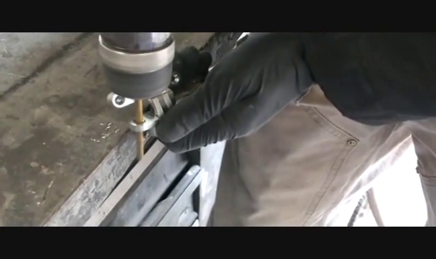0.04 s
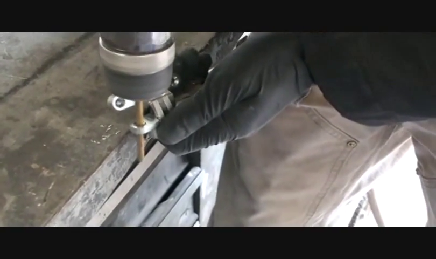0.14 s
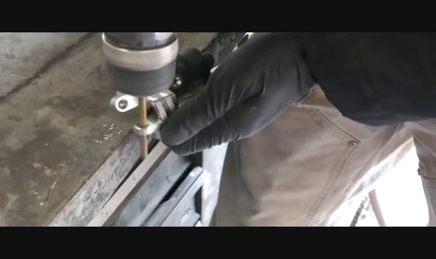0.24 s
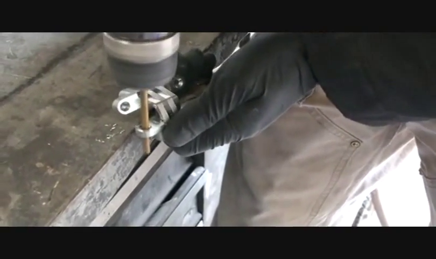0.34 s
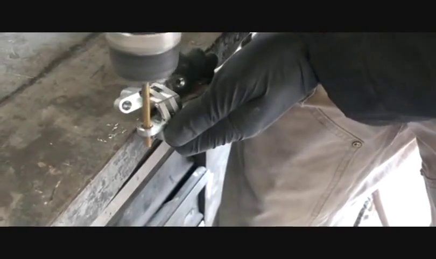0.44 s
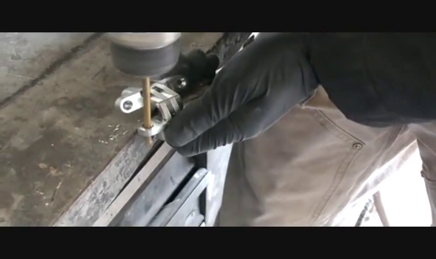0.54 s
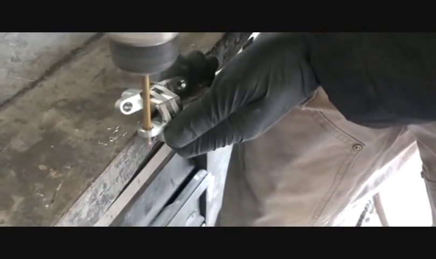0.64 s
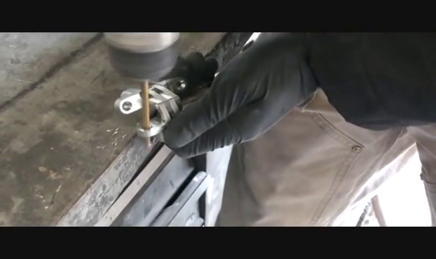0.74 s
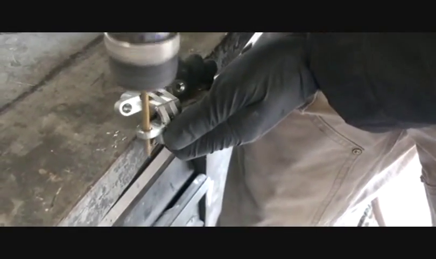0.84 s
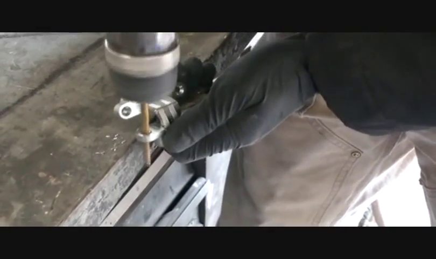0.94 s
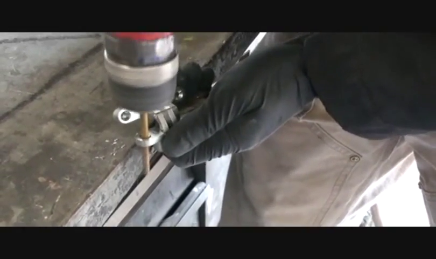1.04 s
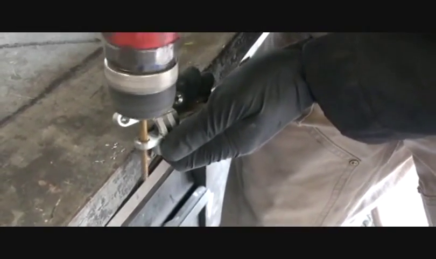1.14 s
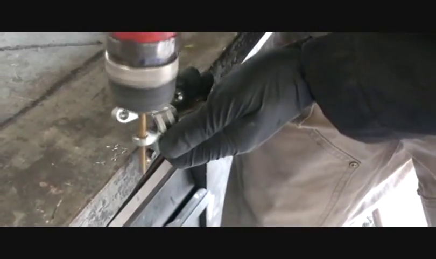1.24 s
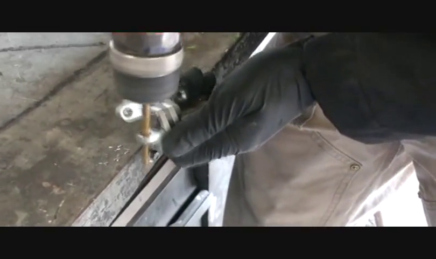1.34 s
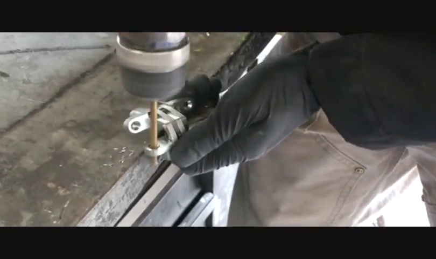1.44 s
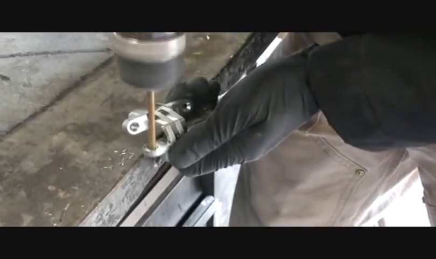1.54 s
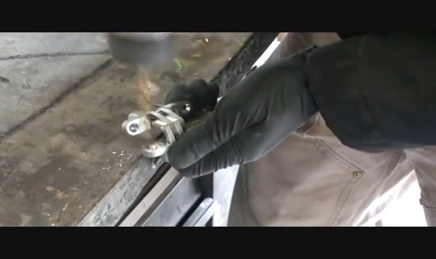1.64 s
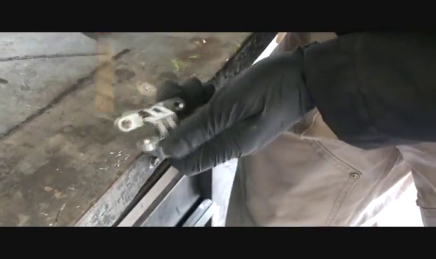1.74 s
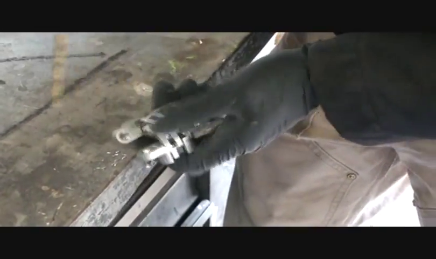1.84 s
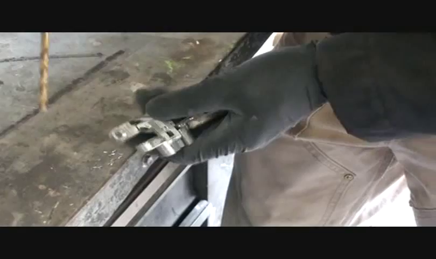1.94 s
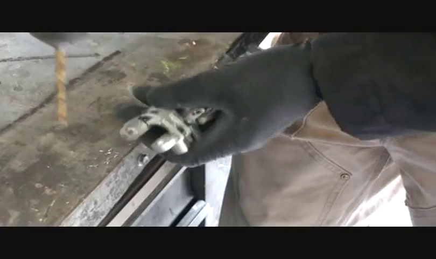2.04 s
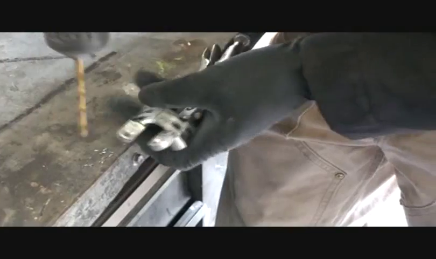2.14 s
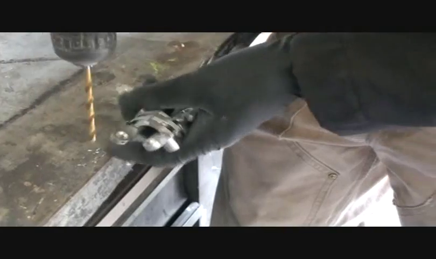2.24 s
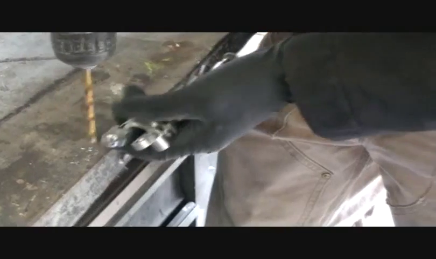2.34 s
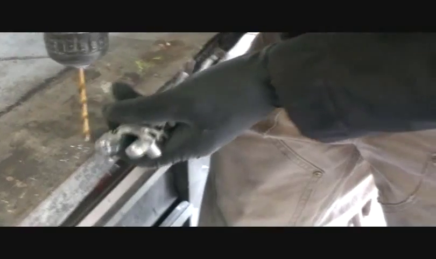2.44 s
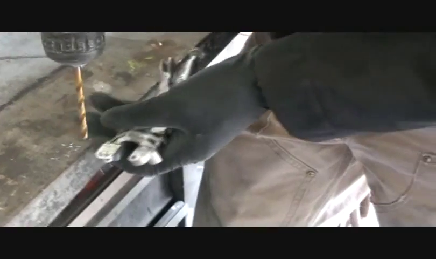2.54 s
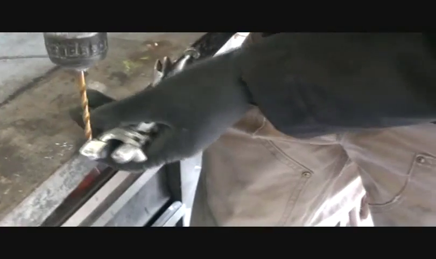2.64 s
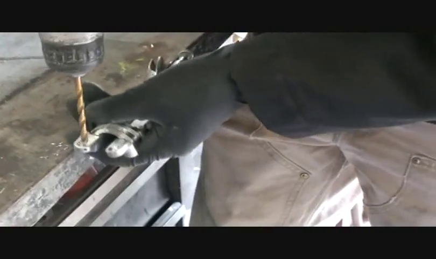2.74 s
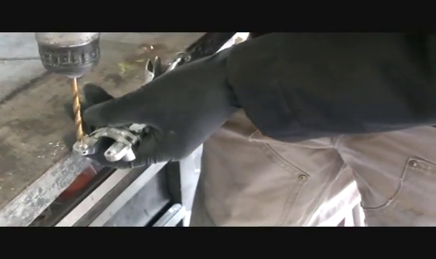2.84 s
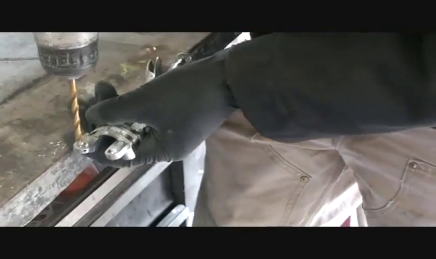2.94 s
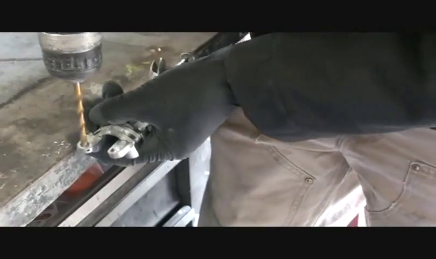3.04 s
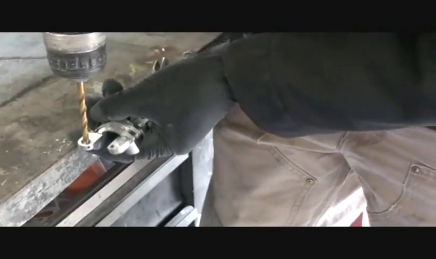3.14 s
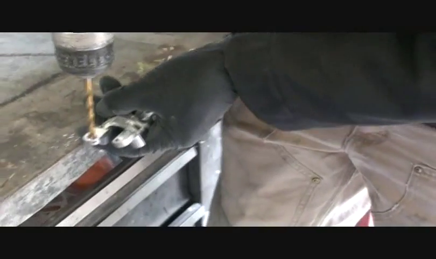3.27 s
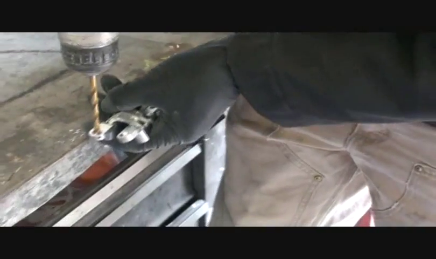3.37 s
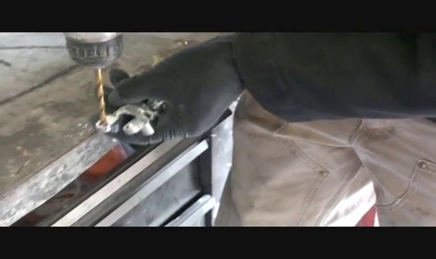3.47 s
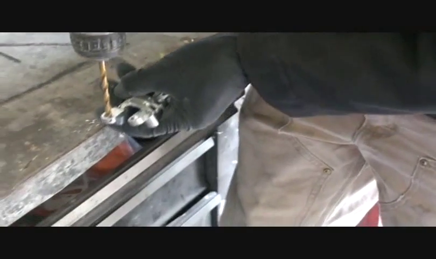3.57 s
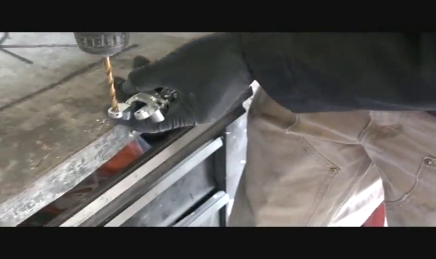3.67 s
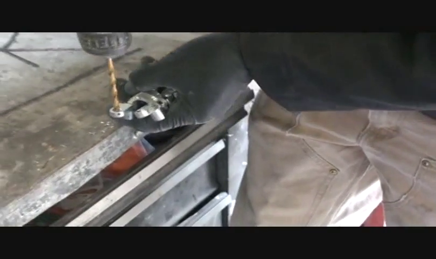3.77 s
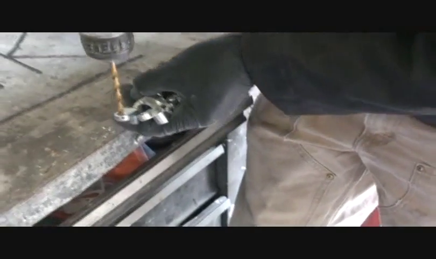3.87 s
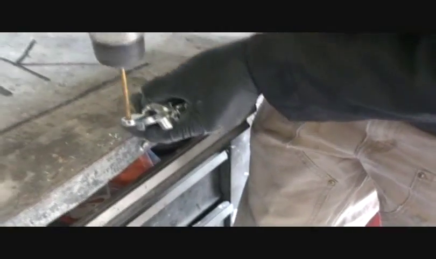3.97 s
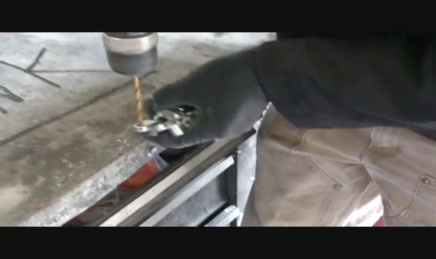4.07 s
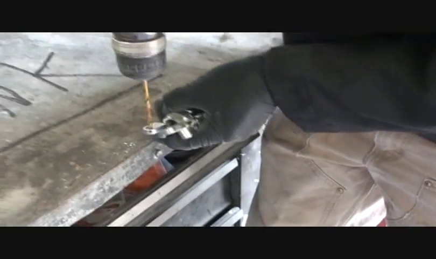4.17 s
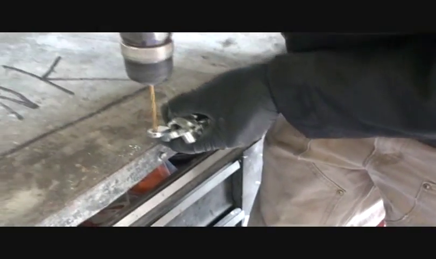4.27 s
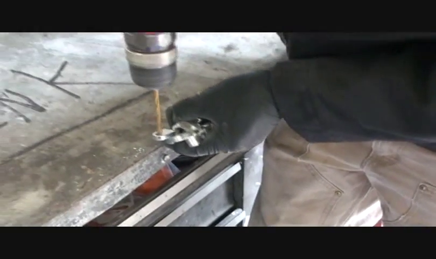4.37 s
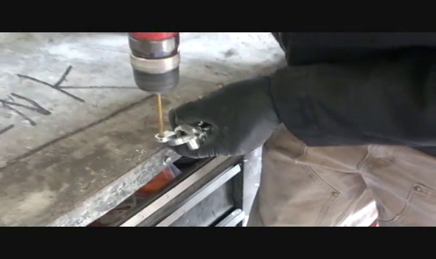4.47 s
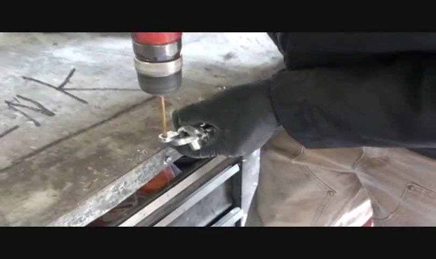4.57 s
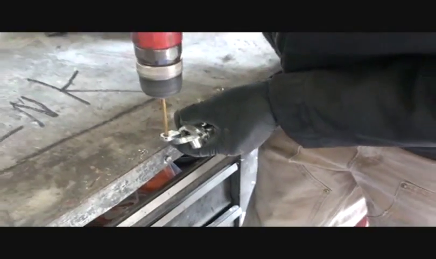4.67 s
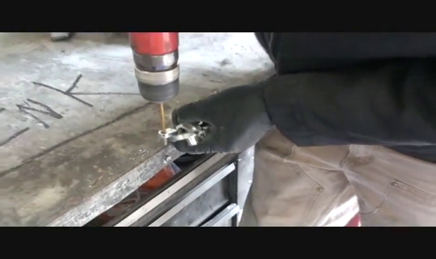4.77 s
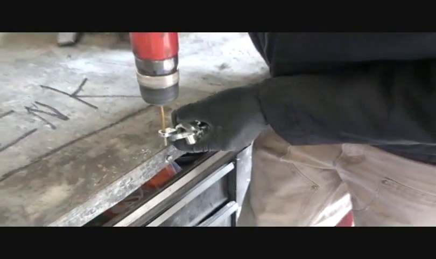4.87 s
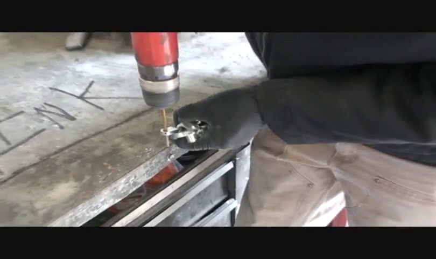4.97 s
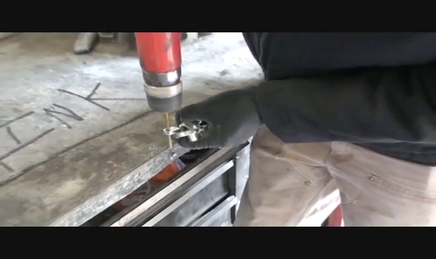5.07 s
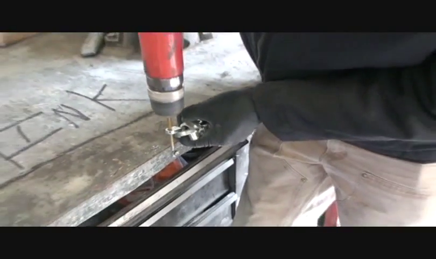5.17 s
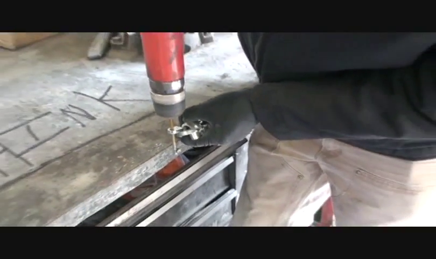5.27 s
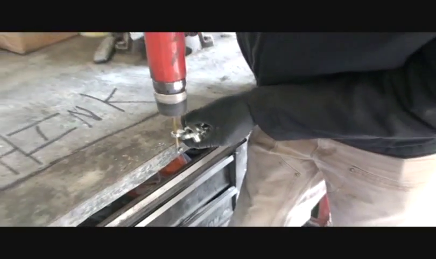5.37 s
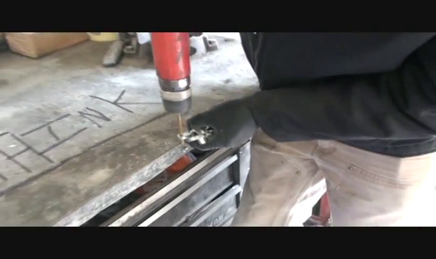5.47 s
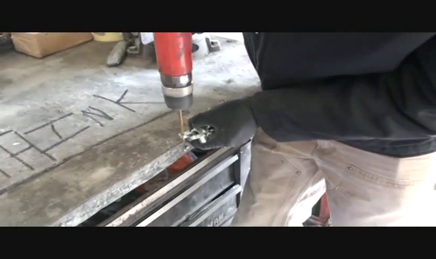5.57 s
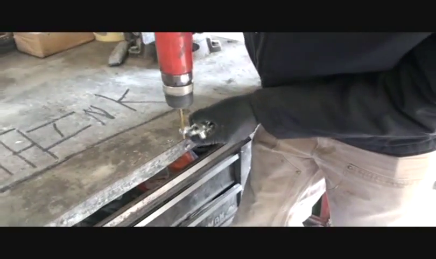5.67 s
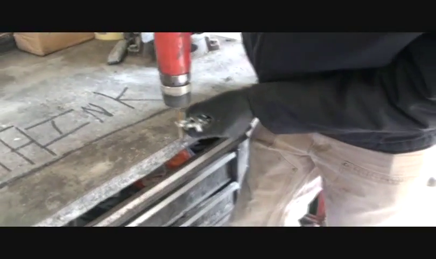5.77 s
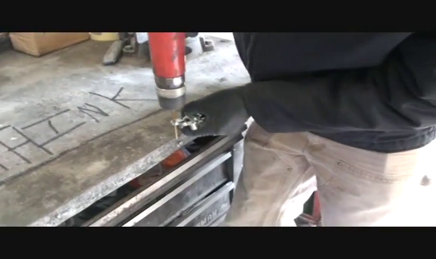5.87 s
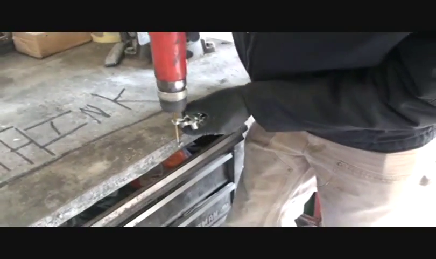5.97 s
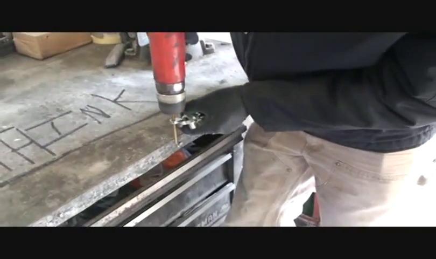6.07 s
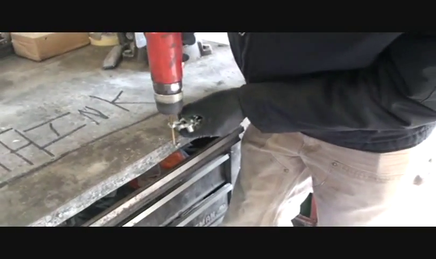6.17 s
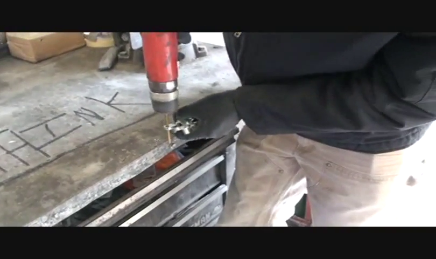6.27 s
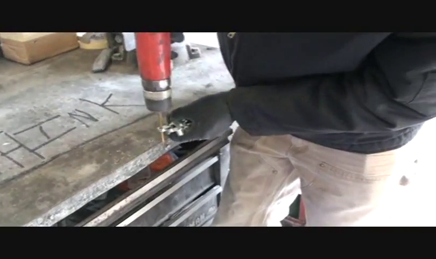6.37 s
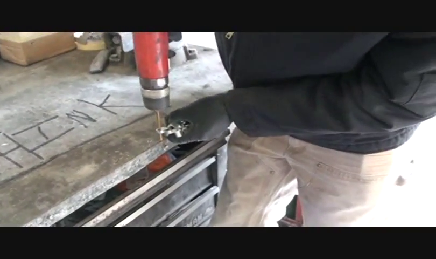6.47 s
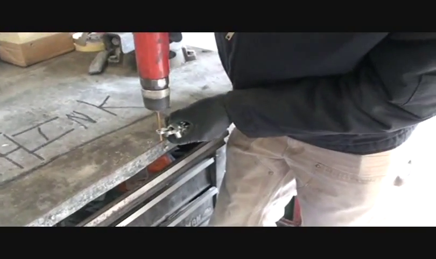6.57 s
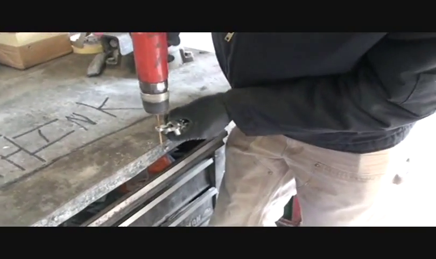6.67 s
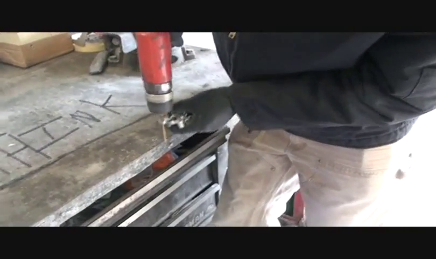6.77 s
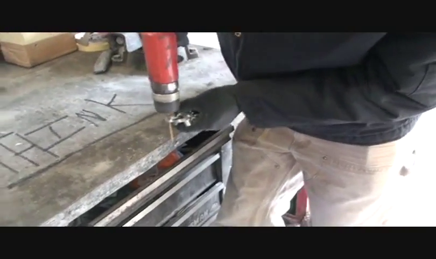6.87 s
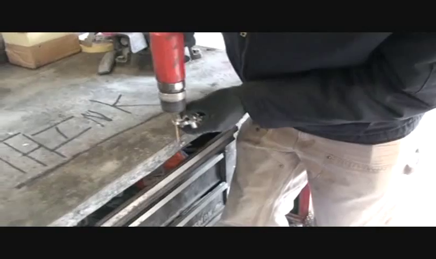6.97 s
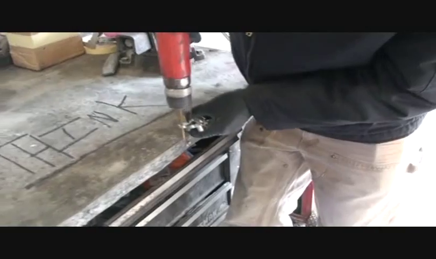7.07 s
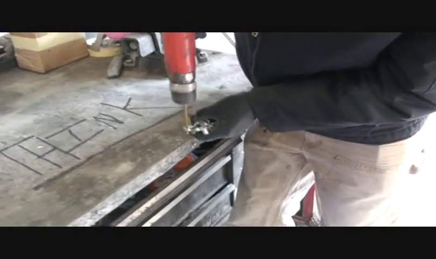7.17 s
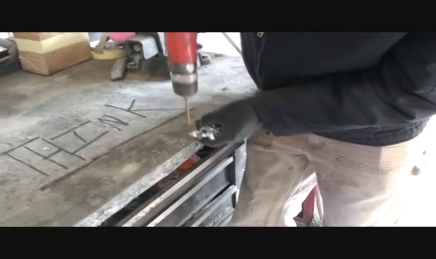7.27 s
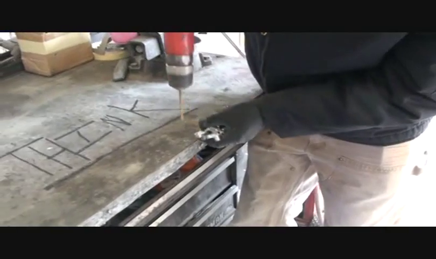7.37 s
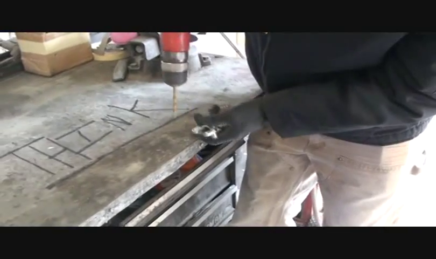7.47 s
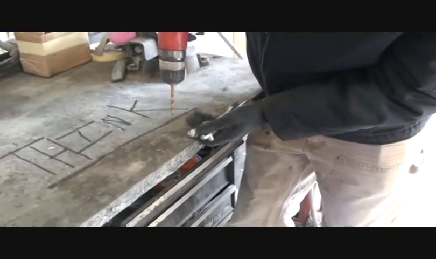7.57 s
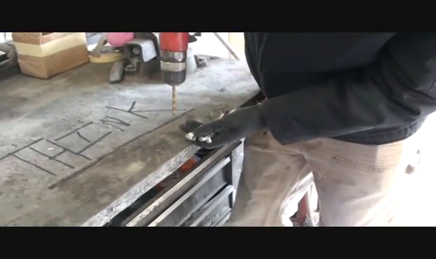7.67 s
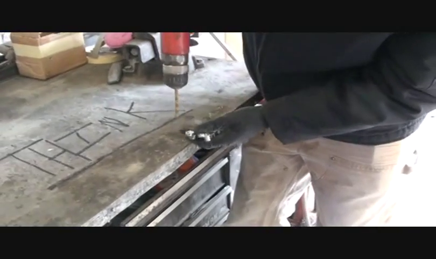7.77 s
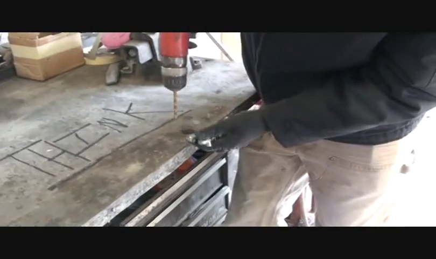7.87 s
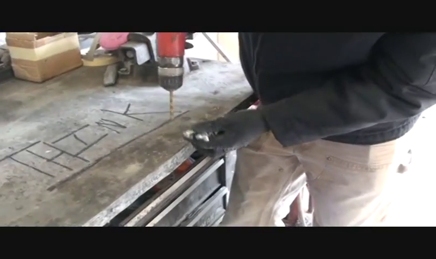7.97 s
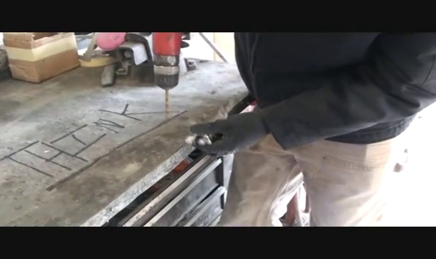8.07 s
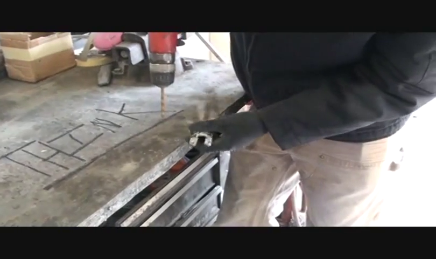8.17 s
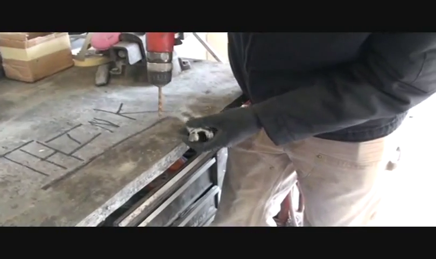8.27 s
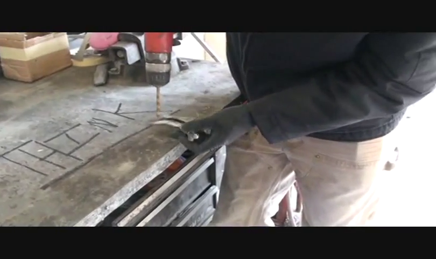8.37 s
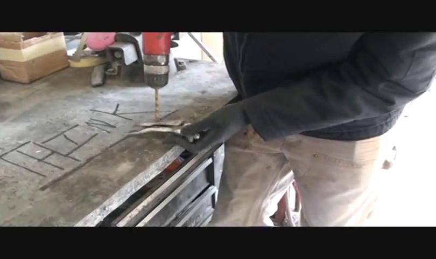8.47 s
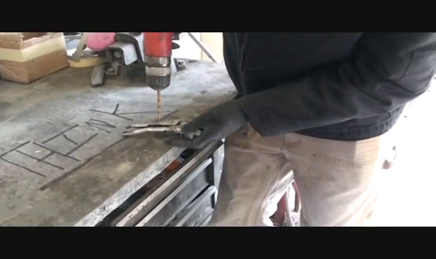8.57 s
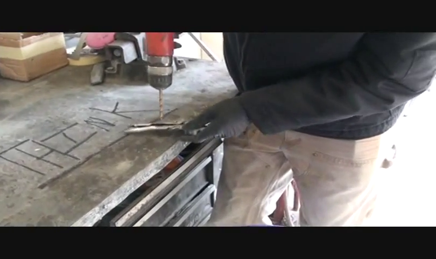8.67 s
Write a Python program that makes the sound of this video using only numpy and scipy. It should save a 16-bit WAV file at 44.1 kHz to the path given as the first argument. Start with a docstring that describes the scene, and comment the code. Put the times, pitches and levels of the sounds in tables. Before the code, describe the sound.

A handheld air drill whines shrilly in a workshop, stops, gives two short bursts, runs long, then coasts down before a loud steel clack.

```python
"""A workshop, mono, one microphone: a handheld air drill bores a metal hinge.
It is already running; a pause, two blips and a long run follow, over shop hiss and a faint air leak.
Vane pulses give a whine that rings in the exhaust and sags when the bit bites; they also chop the hiss.
In the pauses a gloved hand shifts the hinge (soft swells of low noise) amid light knocks; at the end
a steel tool clacks down (noise cracks with damped ringing). The room adds reflections and a tail."""
import sys
import numpy as np
from scipy import signal
from scipy.fft import rfft, irfft, next_fast_len
from scipy.io import wavfile
from scipy.ndimage import uniform_filter1d

SR = 44100
rng = np.random.default_rng(int(sys.argv[2]) if len(sys.argv) > 2 else 0)


def dump(signal):
    """Clip the signal to [-1, 1] and save it as 16-bit WAV at the path in sys.argv[1]."""
    limited = np.clip(np.atleast_2d(signal).T, -1, 1)
    pcm = np.round(limited * 32767).astype(np.int16)
    wavfile.write(sys.argv[1], SR, pcm)


N = 384111
TIME = np.arange(N) / SR
SPIN_UP_S, COAST_S = 0.021, 0.054  # time constants of the rotor with the air on and off


def amp(db):
    """Decibels to gain."""
    return np.exp(np.asarray(db) * np.log(10) / 20)


def unit(x):
    """Scales to rms 1."""
    return x / np.sqrt(np.mean(x ** 2) + 1e-20)


def along(rows):
    """The columns of a curve table, one value per sample."""
    s, *columns = np.transpose(rows)
    return [np.interp(TIME, s, column) for column in columns]


def at_hz(points, hz):
    """Reads a spectrum on a log-frequency axis."""
    f, value = np.transpose(points)
    return np.interp(np.log(hz + 1), np.log(f), value)


def coloured(spectrum, size=N, tilt_db=0):
    """Noise of rms 1 with the given spectrum, tilted per octave."""
    length = next_fast_len(size)
    hz = np.fft.rfftfreq(length, 1 / SR)
    tilt = tilt_db * np.log2((hz + 100) / 2000)
    gain = amp(at_hz(spectrum, hz) + tilt)
    white = rfft(rng.standard_normal(length))
    return unit(irfft(white * gain, length)[:size])


def wander(rate):
    """Random line of rms 1 joining fresh values, rate of them a second."""
    steps = rng.standard_normal(8192)
    return unit(np.interp(TIME * rate, np.arange(len(steps)), steps))


def add(mix, s, sound):
    """Mixes a sound in at time s."""
    part = mix[max(round(s * SR), 0):][:len(sound)]
    part += sound[:len(part)]


def hump(hz, centre_hz, width_hz):
    """Flat-topped, steep-sided gain of a resonance."""
    off = ((hz - centre_hz) / width_hz) ** 2
    return 1 / (1 + off ** 3)


# Vane passes under the steady push of the hand, before any bite, one list a long run: t/s, f/Hz
STEADY_SPEED = [
    [(0.0, 751.8), (0.79, 755.9), (1.062, 751.5), (1.22, 756), (1.328, 735.3), (1.342, 743.3),
     (1.366, 725.6), (1.384, 740.1), (1.58, 759.2), (1.68, 754.7)],
    [(5.03, 744), (5.07, 753), (5.08, 740.5), (5.12, 753.6), (5.13, 742.4), (5.24, 753.3), (5.61, 756.2),
     (6.18, 755), (6.22, 746.1), (6.31, 757.5), (7.31, 756.7)],
]
# Pulls of the trigger: pressed t/s, released t/s, share left open after release,
# hiss level/dB (before a common trim), howl level/dB, whine after release level/dB
TRIGGER_PULLS = [(-0.5, 1.695, 0, -23, -22, 0.5), (4.024, 4.156, 0.0017, -22, -9.5, -2),
                 (4.295, 4.877, .22, -23, -7.5, -9), (4.936, 7.329, 0.0053, -21.5, -9.5, 1)]
VALVE_OPEN_S, VALVE_SHUT_S = 0.02, 0.009
ROTOR_LAG_S = 0.007  # the air comes before the rotor moves


def rotor(sag_hz):
    """Each pull opens the valve and spins the rotor up; let go, it coasts towards the share left open."""
    driven_hz = along(np.vstack(STEADY_SPEED))[0] - sag_hz
    hz, valve, hiss_db, howl_db, vane_db = np.zeros((5, N))
    for press, release, left, hiss, howl, after_db in TRIGGER_PULLS:
        on = TIME >= press
        held = np.minimum(TIME[on], release) - press
        since = np.maximum(TIME[on] - release, 0)
        shut = 1 - np.exp(-since / VALVE_SHUT_S)
        # speed starts from whatever the pull before has left
        catching_up = np.exp(-np.maximum(held - ROTOR_LAG_S, 0) / SPIN_UP_S)
        rising = driven_hz[on] + (hz[on][0] - driven_hz[on]) * catching_up
        hz[on] = rising * (left + (1 - left) * np.exp(-since / COAST_S))
        opening = np.minimum(valve[on][0] + held / VALVE_OPEN_S, 1)
        valve[on] = opening * (1 - (1 - left) * shut)
        fading = np.maximum(1 - held / VALVE_OPEN_S, 0)
        vane_db[on] = vane_db[on][0] * fading + after_db * shut
        hiss_db[on], howl_db[on] = hiss, howl
    return hz, valve, hiss_db, howl_db, vane_db


# Broad exhaust resonances: running free f/Hz, under load f/Hz, half width/Hz
EXHAUST_RESONANCES = [(2410, 2420, 495), (2937, 2570, 325)]
# Their levels running free, before the trim, one list a long run: t/s, lower level/dB, upper level/dB
EXHAUST_LEVELS = [
    [(0.0, -12, -14.5), (0.276, -13, -12.5), (0.346, -16, -11), (0.574, -12.5, -14.5),
     (0.714, -12.5, -22.5), (0.874, -12, -20), (0.94, -12.5, -15.5), (1.178, -13.5, -11.5),
     (1.352, -12, -20.5), (1.468, -8.5, -15), (1.516, -12, -18.5), (1.572, -13, -15.5),
     (1.68, -12.5, -27.5)],
    [(4.99, -19.5, -16.5), (5.34, -18, -17), (5.39, -29, -13), (5.48, -16.5, -15.5), (5.63, -17, -20.5),
     (5.9, -16.5, -10), (6.27, -30, -8.5), (6.29, -20, -9.5), (6.47, -16.5, -12), (6.56, -20, -13.5),
     (7.0, -16.5, -11), (7.27, -32, -11.5), (7.32, -31, -15)],
]
# Trim running free: lower level/dB, upper level/dB
FREE_TRIM = [1.0, 1.48]
# Levels in place of those above once the motor labours: lower level/dB, upper level/dB
LOADED_LEVELS = [-14.5, -21]
# Narrow peaks of the outlet: f/Hz, half width/Hz
OUTLET_PEAKS = [(5270, 130), (6800, 220)]
# Their levels before the shrill trims, one list a long run: t/s, first level/dB, second level/dB
SHRILL_LEVELS = [
    [(0.0, -26.5, -35), (0.088, -23.5, -38.5), (0.626, -25, -31.5), (1.24, -24, -37), (1.328, -25, -32),
     (1.478, -25.5, -39.5), (1.506, -23, -35), (1.68, -31, -33.5)],
    [(5.03, -35, -27), (5.24, -31.5, -33), (6.19, -33, -25.5), (6.22, -29.5, -38.5), (6.26, -36, -28.5),
     (6.72, -25, -27), (6.89, -37.5, -38), (7.31, -30, -31)],
]
# Sharp peaks of the exhaust that gliding harmonics cross: f/Hz, half width/Hz
HOWL_PEAKS = [(2490, 60), (2920, 48)]
LABOUR_LOAD = 0.25  # load at which the labouring levels are reached
FULL_RING_HZ, RING_LAW = 560, 1.7  # below this speed the ringing weakens by this power of it


def exhaust_peaks(hz, load, valve, throb_db, howl_db, shut_db=-3, shrill_db=2.5, shrill_load_db=-10):
    """The exhaust's resonances as they move with load and speed: (f/Hz, half width/Hz, gain)."""
    labour = np.minimum(load / LABOUR_LOAD, 1)
    ring = np.minimum(hz / FULL_RING_HZ, 1) ** RING_LAW * amp(throb_db)
    peaks = []
    free_levels = along(np.vstack(EXHAUST_LEVELS))
    broad = zip(EXHAUST_RESONANCES, free_levels, FREE_TRIM, LOADED_LEVELS)
    for (free_hz, loaded_hz, width), free_db, trim, loaded_db in broad:
        db = (free_db + trim) * (1 - labour) + loaded_db * labour
        centre = free_hz + (loaded_hz - free_hz) * load
        peaks.append((centre, width, ring * amp(db + shut_db * (1 - valve))))
    for (f, width), db in zip(OUTLET_PEAKS, along(np.vstack(SHRILL_LEVELS))):
        peaks.append((f, width, amp(db + shrill_db + shrill_load_db * labour)))
    for f, width in HOWL_PEAKS:
        peaks.append((f, width, ring * amp(howl_db)))
    return peaks


# Relative level of a partial outside the resonances: f/Hz, level/dB
WHINE_BODY = [(150, -47), (330, -31.5), (430, -33), (520, -27), (755, -24.5), (1080, -25), (1380, -32.5),
              (1505, -26.5), (1570, -36.5), (3200, -23), (3780, -27.5), (4400, -33.5), (6200, -35),
              (7500, -43.5), (10000, -49), (12000, -44.5), (15000, -54)]


def whine(turns, hz, load, coast, peaks, flutter_db=0.86, bite_flutter_db=3.0, treble_flutter_db=2.0,
          coast_db=4.5, load_dull_db=-6):
    """Harmonics of the vane pulses swell as they glide through the exhaust's resonances."""
    slow = slice(None, None, 16)  # levels are worked out at every 16th sample
    hz, load, coast = hz[slow], load[slow], coast[slow]
    peaks = [(np.broadcast_to(f, N)[slow], width, gain[slow]) for f, width, gain in peaks]
    out = np.zeros(N)
    for k in range(1, 17):
        # a coasting rotor gives a deeper note, a loaded one loses its middle partials
        deepening = coast_db * coast * (1 if k < 5 else -1)
        dulling = load_dull_db * load * hump(k * hz, 3900, 1400)
        body = amp(at_hz(WHINE_BODY, k * hz) + deepening + dulling)
        power = body ** 2 + sum((gain * hump(k * hz, f, width)) ** 2 for f, width, gain in peaks)
        # turbulence shakes the partials; up to the fourth it grows with number and with the bite
        shake_db = treble_flutter_db
        if k < 5:
            shake_db = (flutter_db + bite_flutter_db * np.sqrt(load)) * k / 4
        level = np.sqrt(2 * power) * amp(shake_db * wander(110)[slow])
        tone = np.cos(2 * np.pi * (k * turns + rng.random()))
        out += np.interp(TIME, TIME[slow], level) * tone
    return out


# Dips where sound off the bench cancels the direct hiss: from t/s, to t/s, f/Hz, half width/Hz
BENCH_DIPS = [(0, 1.42, 925, 85), (0, 1.4, 2057, 60)]


def dipped(x):
    """Takes narrow bands out of the hiss while the drill is held low over the bench."""
    hz, spectrum = np.fft.rfftfreq(N, 1 / SR), rfft(x)
    for start, end, f, width in BENCH_DIPS:
        held = np.interp(TIME, [start - 0.1, start, end, end + 0.32], [0, 1, 1, 0])
        x = x - held * irfft(spectrum * hump(hz, f, width), N)
    return x


# Colour of the rushing air: f/Hz, relative level/dB per Hz
HISS_COLOUR = [(25, -52.5), (80, -29), (300, -52.5), (480, -25), (700, -9.5), (1100, -3), (1700, -3.5),
               (2500, 8), (3400, 3.5), (4200, 6.5), (5400, 2.5), (7000, 0), (9000, -4), (11000, -12.5),
               (15500, -18)]
HISS_TRIM_DB = 2.5  # whole hiss above its treble part


def exhaust_hiss(air, hiss_db):
    """Air rushing out of the exhaust is broad noise, as strong as the flow."""
    return air * amp(hiss_db + HISS_TRIM_DB) * dipped(coloured(HISS_COLOUR))


def sideways_beam(turns, valve, load, beam_db=-12.5):
    """The fourth harmonic leaves the exhaust sideways and comes back off the walls only."""
    return amp(beam_db) * valve * (1 - load) * np.cos(2 * np.pi * 4 * turns)


# Colour of the rattling vanes and gears: f/Hz, relative level/dB per Hz
RATTLE_COLOUR = [(150, -41.5), (400, -18.5), (800, -17.5), (1100, 5.5), (1600, 1.5), (2000, 7), (2550, -1),
                 (3300, 0.5), (6000, -15), (15000, -41.5)]


def gear_rattle(hz, pulses):
    """Vanes and gears rattle as the rotor speeds up or brakes, more the faster its speed changes."""
    change = uniform_filter1d(np.abs(np.gradient(hz)) * SR, size=600)  # Hz per second
    lurch = np.clip(change / 9000, 0, 1)
    return amp(-18.5 + 2.1 * wander(250)) * lurch * pulses * coloured(RATTLE_COLOUR)


# Decay of the shop: f/Hz, t60/s
ROOM_DECAY = [(150, 0.95), (1000, 0.31), (3000, 0.59), (7000, 0.58), (15000, 0.42)]
# Bench, floor and walls, heard after the direct sound: delay t/s, level/dB
ROOM_REFLECTIONS = [(.0047, -22.5), (.0145, -17.5), (.023, -18), (0.139, -33), (.25, -39.5), (0.401, -49)]


def room(x, tail_db=-16, build_s=0.019):
    """A few distinct reflections and a diffuse tail that dies band by band."""
    hz, t, bands = signal.stft(rng.standard_normal(SR), SR, nperseg=256)
    decay = amp(-60 * t / at_hz(ROOM_DECAY, hz)[:, None])
    bands = bands * decay * (1 - np.exp(-t / build_s))
    tail = signal.istft(bands, SR, nperseg=256)[1]
    response = amp(tail_db) * tail / np.linalg.norm(tail)
    for delay, db in ROOM_REFLECTIONS:
        add(response, delay, amp([db]))
    return signal.fftconvolve(x, response)[:N]


# Colour of the shop's background: f/Hz, relative level/dB per Hz
SHOP_COLOUR = [(18, -54.5), (30, -25.5), (137, -9.5), (420, -17), (479, -9), (851, -5), (2480, -11.5),
               (2690, -11), (3680, -15.5), (4420, -9.5), (6040, -14), (7070, -8.5), (10500, -16),
               (12200, -7.5), (15500, -38)]
SHOP_DB = -49


def shop_background():
    """Steady noise of the shop, its level drifting slightly."""
    return amp(SHOP_DB + 0.46 * wander(2.7)) * coloured(SHOP_COLOUR)


# Colour of the air seeping from the idle tool: f/Hz, relative level/dB per Hz
LEAK_COLOUR = [(300, -40), (900, -11.5), (1300, 9.5), (1700, -7), (3000, -22), (4600, -17), (6000, -29),
               (15000, -48.5)]
# Course of the leak: t/s, level/dB
LEAK_LEVEL = [(2.1, -73), (2.45, -57.5), (3.1, -59), (3.6, -60), (4.0, -54.5), (4.3, -70)]


def air_leak():
    """Air seeping through a small gap is faint flickering noise, strongest in the pause."""
    return amp(along(LEAK_LEVEL)[0] + 1.5 * wander(12)) * coloured(LEAK_COLOUR)


# The bit bites and its flutes catch: start t/s, end t/s, sag f/Hz (before inertia),
# catches per s, throb of the exhaust ringing level/dB (before smoothing)
BIT_BITES = [(1.312, 1.39, 2, 24, 2), (4.12, 4.16, 63, 22, 0), (4.345, 4.405, 35.5, 22, 0),
             (4.405, 4.455, 200, 17, 0.5), (4.455, 4.71, 230, 17, 1), (4.71, 4.786, 42, 22, 0.5),
             (4.785, 4.87, 14.8, 22.5, -0.5), (5.016, 5.232, 2.014, 22, 2.5)]
CATCH_SHARE = 0.15  # part of the sag that comes and goes with each catch


def bites():
    """Speed lost to the bit (Hz), eased by the rotor's inertia, and the throb of its flutes (dB)."""
    sag, throb_db = np.zeros(N), np.zeros(N)
    for start, end, sag_hz, rate, depth_db in BIT_BITES:
        biting = (TIME >= start) & (TIME < end)
        catch = np.sin(2 * np.pi * rate * (TIME - start))
        sag += biting * sag_hz * (1 + CATCH_SHARE * catch)
        throb_db -= biting * depth_db * catch
    keep = np.exp(-1 / (SPIN_UP_S * SR))
    return signal.lfilter([1 - keep], [1, -keep], sag), uniform_filter1d(throb_db, size=200)


# Colour of the bit scraping as it bites: f/Hz, relative level/dB per Hz
CUTTING_COLOUR = [(40, -34), (170, -12.5), (330, -18.5), (1200, -14.5), (2600, 2.5), (4500, -16),
                  (6300, 0.5), (7400, -15), (9000, -2), (11000, -18.5), (15000, -29.5)]


def bit_scrape(air, load, cutting_db=-28):
    """The bit tears metal as rough noise that grows with load and air."""
    return air * load * amp(cutting_db + 2.5 * wander(300)) * coloured(CUTTING_COLOUR)


COAST_AIR_DB = -9.5  # air that the coasting rotor still pumps, at full speed
FULL_PULSE_HZ, PULSE_LAW = 483, 2.5  # below this speed the vane pulses weaken by this power of it


def drill(jitter=0.00074, load_jitter=0.0082, coast_jitter=0.03, chop=0.16, load_chop=0.25, whine_db=-1.0):
    """One rotor drives the whine and chops the hiss, scrape and rattle; also gives the beam for the room."""
    sag_hz, throb_db = bites()
    hz, valve, hiss_db, howl_db, vane_db = rotor(sag_hz)
    air = valve + (1 - valve) * amp(COAST_AIR_DB) * hz / hz.max()
    pulses = amp(vane_db) * np.minimum(hz / FULL_PULSE_HZ, 1) ** PULSE_LAW
    load = np.clip((750 - hz) / 240, 0, 1)  # any speed below 750 Hz counts, coasting too
    unsteady = jitter + load_jitter * np.sqrt(load) + coast_jitter * (1 - valve)
    turns = np.cumsum(hz * (1 + unsteady * wander(300))) / SR  # vane passes so far
    peaks = exhaust_peaks(hz, load, valve, throb_db, howl_db)
    tone = amp(whine_db) * pulses * whine(turns, hz, load, np.clip(1 - air, 0, 1), peaks)
    noise = exhaust_hiss(air, hiss_db) + bit_scrape(air, load) + gear_rattle(hz, pulses)
    puffs = 1 + (chop + load_chop * load) * np.cos(2 * np.pi * turns)
    return tone + unit(puffs) * noise, sideways_beam(turns, valve, load)


# Glove and sleeve shifting on the frame: t/s, length/s, level/dB
GLOVE_BUMPS = [(2.211, .06, -56), (2.437, 0.062, -51), (3.42, 0.13, -54), (3.553, 0.17, -50.5),
               (3.8, .25, -58), (8.22, .06, -61)]
# Colour of the cloth: f/Hz, relative level/dB per Hz
CLOTH_COLOUR = [(30, -29), (100, -7), (250, -6.5), (450, -16), (1200, -24), (6000, -30)]


def handling():
    """Soft low swells of cloth against the frame."""
    swell = sum(amp(db) * np.exp(-(2 * (TIME - s) / length) ** 2) for s, length, db in GLOVE_BUMPS)
    return swell * coloured(CLOTH_COLOUR)


# Knocks of hinge and tools: t/s, level/dB (before a common trim), brightness/dB per octave
METAL_KNOCKS = [(2.375, -36, 7), (2.415, -40, -5), (2.603, -41, 0), (2.622, -38, -2), (2.64, -42, -1),
                (3.565, -42, -7), (3.9, -37, -6), (3.994, -36, -2), (8.593, -14.5, 4), (8.596, -16.5, 2),
                (8.602, -33, -4), (8.61, -21.5, -1), (8.702, -37, -2)]
# Ringing modes of the steel: f/Hz, relative level/dB, t60/s
STEEL_MODES = [(899, -11, 0.21), (1113, 13, 0.14), (1292, -6.5, 0.33), (2220, -5.5, 0.23),
               (2482, -13, 0.12), (2840, -12, 0.12), (3212, -12, 0.47), (3526, -10, 0.14)]
# Colour of the crack before its brightness tilt: f/Hz, relative level/dB per Hz
CRACK_COLOUR = [(88, -60), (150, -35), (780, -2), (1090, -0.5), (1600, -5), (1760, -2.5), (2750, 1),
                (4300, -14.5), (5870, -11.5), (13000, -32), (15500, -33.5)]


def knocks(crack_t60=0.052, ring_db=-9, trim_db=-5.5):
    """Each knock is a short crack and a damped ring of hand-held steel."""
    out, t = np.zeros(N), np.arange(8192) / SR
    for s, db, bright_db in METAL_KNOCKS:
        crack = coloured(CRACK_COLOUR, size=len(t), tilt_db=bright_db) * amp(-60 * t / crack_t60)
        ring = np.zeros(len(t))
        for f, level, t60 in STEEL_MODES:
            ring += amp(level - 60 * t / t60) * np.sin(2 * np.pi * (f * t + rng.random()))
        ring = amp(ring_db) * ring / np.abs(ring).max()
        add(out, s, amp(db + trim_db) * (crack + ring))
    return out


def scene():
    """The drill, the hand and the steel sound in the shop, over its steady hiss and a faint leak."""
    motor, beam = drill()
    direct = motor + handling() + knocks()
    reflected = room(direct + beam)
    return (direct + reflected + shop_background() + air_leak())[None]


EDGE_HZ = 15680  # upper band limit


def record(dry, knee=0.58, low_cut_hz=50):
    """At the microphone the loudest peaks are rounded off; then the low cut and the band limit."""
    over = np.maximum(np.abs(dry) - knee, 0)
    squeezed = (1 - knee) * np.tanh(over / (1 - knee))
    rounded = np.sign(dry) * (np.abs(dry) - over + squeezed)
    low_cut = signal.butter(2, low_cut_hz, "highpass", fs=SR, output="sos")
    thinned = signal.sosfilt(low_cut, rounded)
    band_limit = signal.firwin(511, EDGE_HZ, window=("kaiser", 9), fs=SR)
    return signal.oaconvolve(thinned, band_limit[None], "same")


dry = scene()
out = record(dry)
dump(out)
```